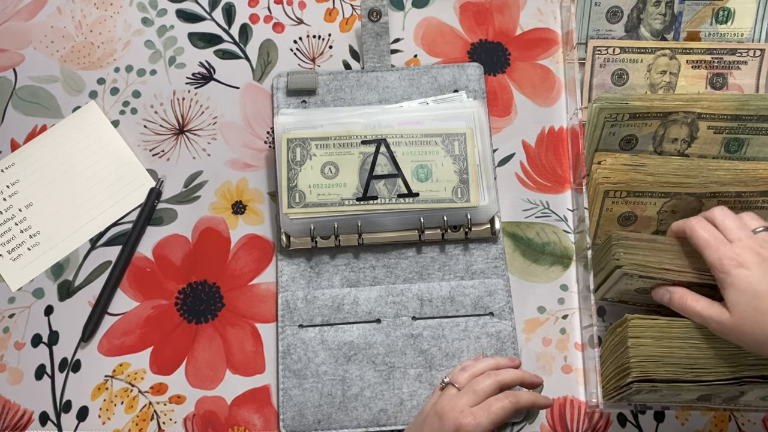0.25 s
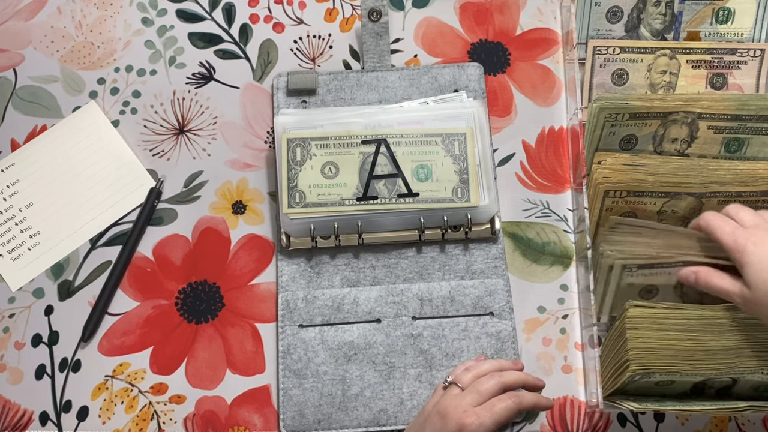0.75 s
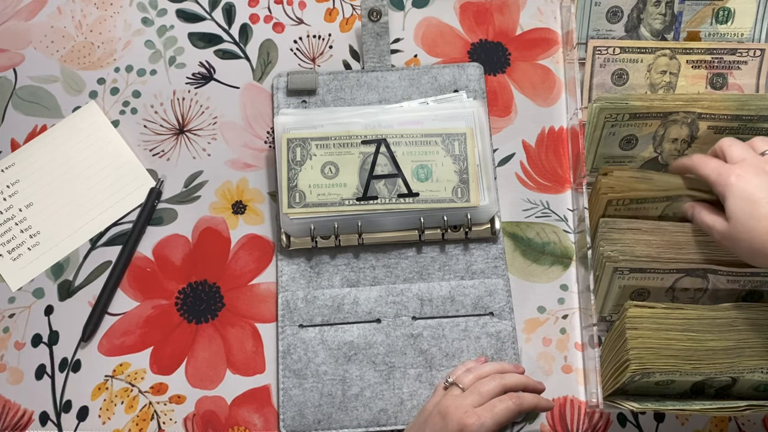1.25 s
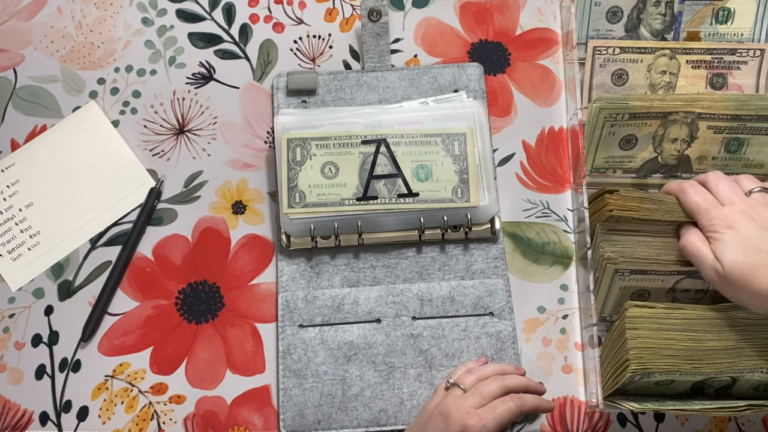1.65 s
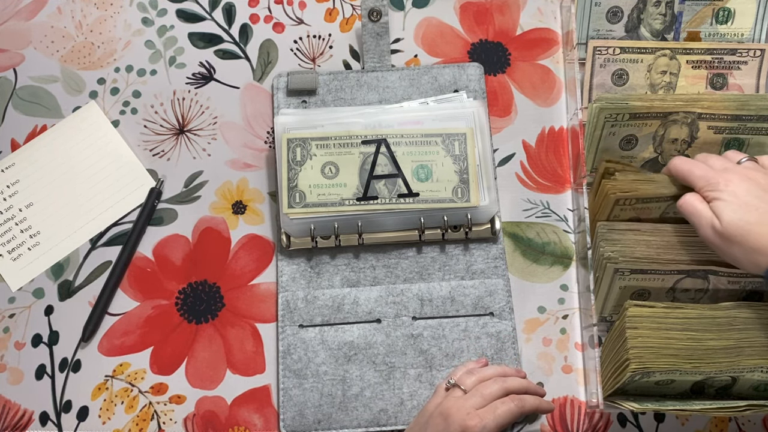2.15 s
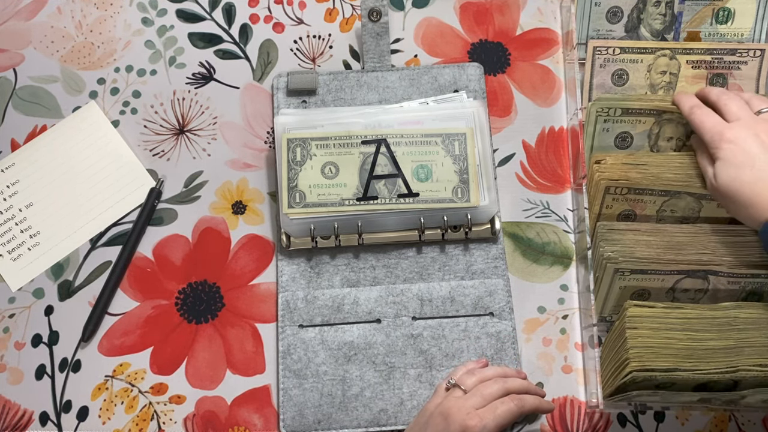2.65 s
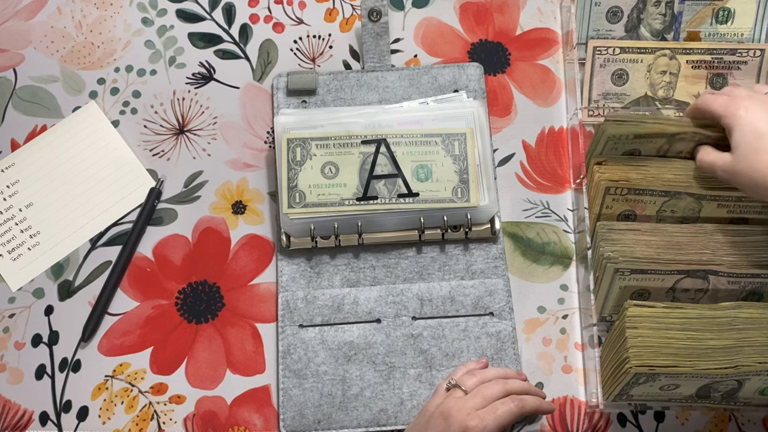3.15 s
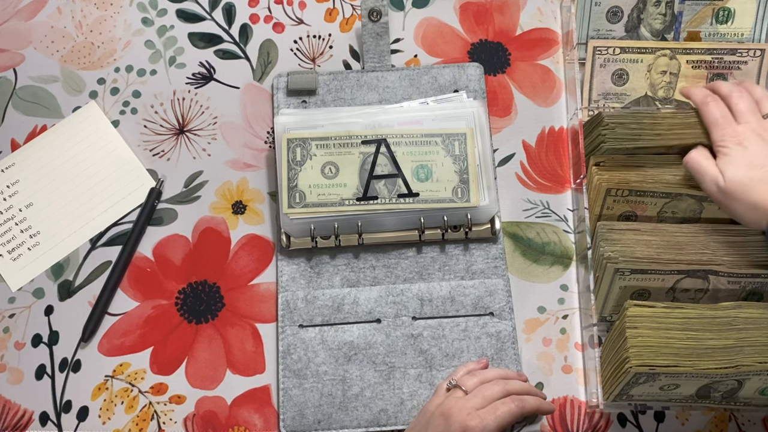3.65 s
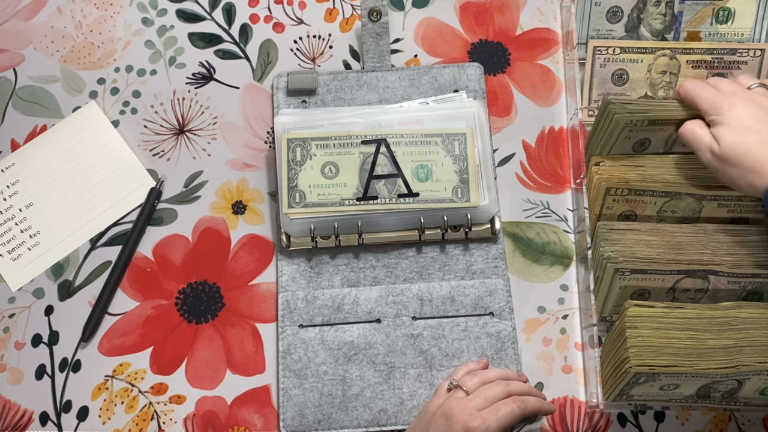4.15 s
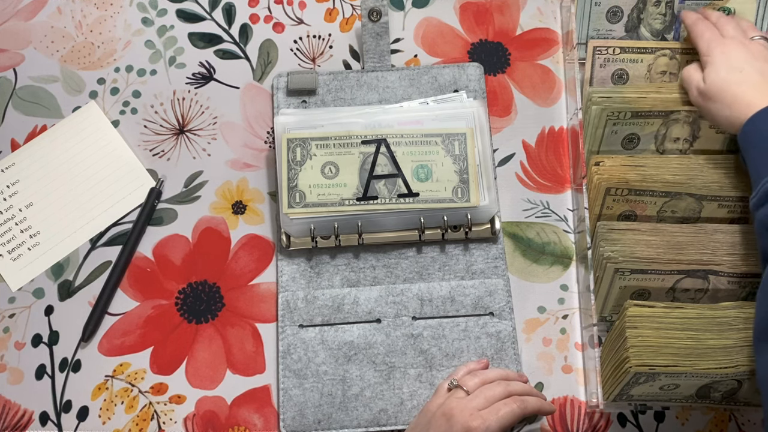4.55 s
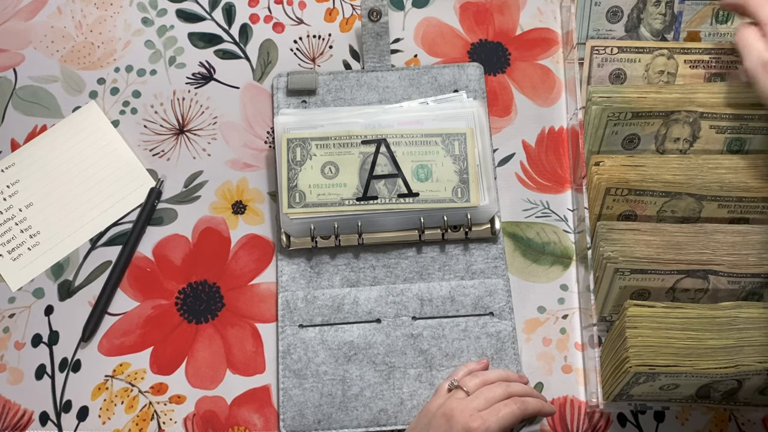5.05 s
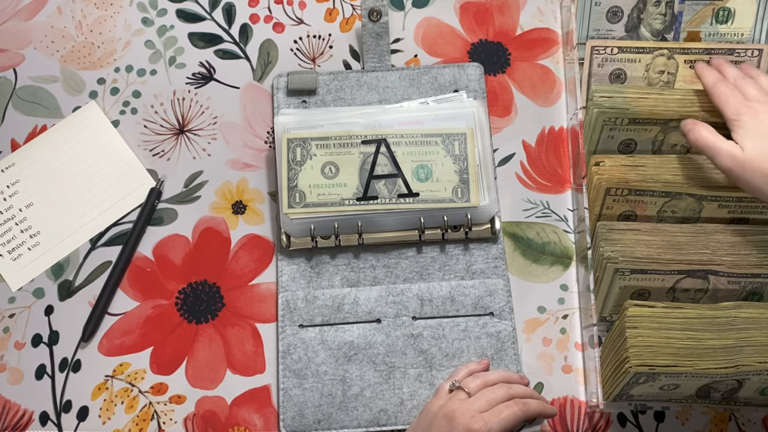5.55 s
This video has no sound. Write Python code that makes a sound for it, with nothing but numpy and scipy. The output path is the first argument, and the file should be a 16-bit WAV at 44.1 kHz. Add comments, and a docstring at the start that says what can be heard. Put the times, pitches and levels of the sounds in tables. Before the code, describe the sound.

Paper money stacks are thumbed through in a tray, with faint rustles, small ticks and a few hard snaps in a quiet room.

```python
"""The after-sound of a snap just gone by, over the low rumble of a house; then paper notes in a tray.
A thumb riffles the stacks on a desk, below and right of a close two-port microphone.
Sheets rub in dense clusters of tiny buckles and flick free in short volleys: ticks and a few hard snaps.
The tray rings, a small room answers with decaying noise, and a wrist knocks softly on the desk near the end."""
import sys
import numpy as np
from scipy import signal
from scipy.fft import rfft, irfft, next_fast_len
from scipy.io import wavfile
from scipy.ndimage import uniform_filter1d

SR = 44100
rng = np.random.default_rng(int(sys.argv[2]) if len(sys.argv) > 2 else 0)


def bounce(signal):
    """Save signal as a 16-bit WAV file at the path given by the first command-line argument."""
    frames = np.transpose(np.atleast_2d(signal))
    limited = np.clip(frames, -1, 1)
    pcm = np.round(limited * 32767).astype(np.int16)
    wavfile.write(sys.argv[1], SR, pcm)


N = 255691
LEAD = SR // 20  # samples of run-in before the start
# paper bands shared by flicks and rubs: (centre_hz, width_hz)
THUD, CRACKLE, SIZZLE = (500, 480), (4200, 5500), (9600, 4600)
OPPOSITE = np.array([[1], [-1]])  # left and right ports in opposite sense


def undb(db):
    """Gain of a dB value."""
    return 10 ** (np.asarray(db) / 20)


def unit(x):
    """Scaled to rms 1."""
    return x / np.sqrt(np.mean(x ** 2))


def band(x, hz, width):
    """Two-pole resonance, applied twice."""
    b, a = signal.iirpeak(hz, hz / width, fs=SR)
    return signal.lfilter(b, a, signal.lfilter(b, a, x))


def colour(x, table, lag_s=0.):
    """Shapes x by (hz, gain_db) points, joined over log frequency, and delays it."""
    size = next_fast_len(x.shape[-1] + LEAD)
    hz = np.fft.rfftfreq(size, 1 / SR) + 1
    points_hz, points_db = np.array(table)[:, 0], np.array(table)[:, 1]
    gain = undb(np.interp(np.log(hz), np.log(points_hz), points_db))
    delay = np.exp(-2j * np.pi * hz * lag_s)
    return irfft(rfft(x, size) * gain * delay, size)[..., :x.shape[-1]]


def creases(shape, rate, scatter_db):
    """Tiny buckles of paper: random clicks (rate per second) of scattered size over faint noise."""
    hit = rng.random(shape) < rate / SR
    clicks = hit * rng.standard_normal(shape) * undb(scatter_db * rng.exponential(size=shape))
    return unit(clicks + 0.0054 * rng.standard_normal(shape))


def flicks():
    """Each flick is a short volley of buckles that shakes the free flap and the paper's other bands, then settles."""
    # sheets flicking free: start_s, flap_peak_db (before panning), flap_hz,
    # thud_db, crackle_db, sizzle_db (all against the flap), left_minus_right_db, swell_ms
    flick_table = [(0.168, -50.5, 1570, -17, -1, -1.5, -5, 2), (0.277, -50, 1720, -16, -10, -28, -8, 5.1),
                   (0.351, -39, 1840, -12.5, -1, -4, -4.5, 2), (0.393, -47.5, 2230, -29, -20, -25, 4, 1.5),
                   (0.495, -41, 1330, -19, -12, -15, -2.0, 1.7), (0.577, -55, 1420, -6, 0, -1, -8, 3.1),
                   (0.63, -57, 1940, -7, -17, -23, 8, 1.8), (0.663, -54.5, 1170, -8, -29, -24, -7, 6.5),
                   (0.734, -40, 1460, -42, -19, -24, -8, 2.1), (0.744, -42.5, 1580, -26, -7.5, -26, 2, 4.6),
                   (0.78, -50, 770, -24, -23, -22, -13, 2.7), (0.798, -54, 865, 7.5, 1, -13, 2.5, 1.8),
                   (0.842, -47, 1670, -22, -30, -25, -6, 1.1), (1.015, -63.5, 1900, 0, 4, 4.5, 5, 1.5),
                   (1.155, -61, 850, 0, -28, -25, -4.0, 2.6), (1.435, -56.5, 1360, 0, -2, -13, -4, 1.3),
                   (1.457, -54.5, 1230, -9, -14, -3.5, -3, 2.2),
                   (1.603, -23.5, 1980, -18.5, -9, -32, -4, 2.6),
                   (1.611, -23.5, 2070, -24, -9.5, -21, 6, 4.7),
                   (1.617, -20.5, 1300, -31.5, -19, -33, -9, 2.45),
                   (1.939, -43, 1600, -7.5, -11, -15, -3.5, 6.8),
                   (1.992, -45, 1660, -27, -17, -21, -6.5, 1.6), (2.157, -48.5, 1360, -13, 4, -4, -5, 0.89),
                   (2.23, -38, 1080, -26, -15, -26, -6.5, 4.2),
                   (2.244, -31, 1060, -14.5, -9, -23, -1.5, 2.1),
                   (2.265, -50, 1150, -14, -20, -27, -1.0, 4.6), (2.361, -61, 1440, -19, 4.5, -9, 2, 1.9),
                   (2.405, -59.5, 1860, -9.5, -11, -8, -6, 1.6),
                   (2.546, -59.5, 1170, -2.5, -20.5, -19.5, -5, 2.3),
                   (2.758, -43.5, 1090, -27, -19.5, -14.5, -3, 1.2),
                   (2.955, -58, 980, -18.5, -17, -17, -6.5, 2.6),
                   (2.988, -51, 920, -11, -16, -33, -4.0, 1.7),
                   (3.051, -32.5, 1200, -35, -22.5, -28, -5, 2.24),
                   (3.063, -38.5, 1440, -16.5, -9.5, -13.5, 5, 0.84),
                   (3.302, -57.5, 1000, -7, -15, -27.5, -3.5, 3.24),
                   (3.442, -51, 977, -8.5, -10, -22, -5.5, 1.8),
                   (3.485, -15.5, 1850, -21.5, 2.5, -17, 5.5, 4.2),
                   (3.487, -11.5, 1550, -22.5, -4, -8, -9, 3.7),
                   (3.495, -16.5, 1680, -20, -6.5, -7, -8, 0.93),
                   (3.955, -56, 2140, -8, -4, -10.5, -1.5, 1.6),
                   (4.003, -50, 1040, -16.5, -16, -18, -6.5, 2.9),
                   (4.04, -46.5, 1380, -9, -8, -16, -5.5, 2.7), (4.073, -44, 2090, -26, -9, -16, 5, 1.6),
                   (4.101, -43, 1935, -24, -5, -13, -3, 3.5), (4.246, -45, 2100, -20.5, -16, -15, -1, 1.9),
                   (4.271, -39, 1720, -18.5, 0.5, -9, -5.5, 2.9),
                   (4.302, -36.5, 960, -18.5, -20, -30, -5, 2.5),
                   (4.319, -33.5, 1315, -17.5, -14, -21.5, -1, 2.3),
                   (4.342, -40, 900, -27.5, -31, -37, -8, 1.87),
                   (4.475, -50.5, 958, -14, -17, -24.5, -5, 3.6),
                   (4.501, -54.5, 940, 4.5, -35, -34, -4, 1.5),
                   (4.571, -52.5, 905, -26, -16.5, -18, -6, 2.3),
                   (4.611, -51, 1556, -42, -29, -24, -3.5, 1.1),
                   (4.738, -38.5, 1003, -34, -24.5, -37, -4.5, 2.8),
                   (4.904, -35, 990, -36, -9.5, -22, -5, 2.3), (4.912, -40, 910, -36, -31, -36, 1, 1.7),
                   (4.981, -36.5, 1197, -22.5, -12, -17, -3.5, 2.33),
                   (5.295, -56, 2150, -17.5, -11, -13.5, -3, 2.8),
                   (5.312, -42, 990, -12, -12, -26, -7.5, 3.1),
                   (5.328, -41.5, 2110, -4, -14.5, -20, 7, 2.8),
                   (5.391, -53, 1383, -22.5, -17.5, -5.5, -4, 1.25),
                   (5.481, -43, 1130, -2.5, -10.5, -21.5, -3.5, 1.27),
                   (5.672, -42.5, 950, -12.5, -11, -11.5, -4, 2.76),
                   (5.74, -56, 910, -10, -25, -26.5, -4, 2.4),
                   (5.765, -65.5, 840, -9.5, -4, -11.5, -12, 2.4)]
    # a snap just before the start: the columns of a flick after start_s
    earlier_snap = (-14, 1764.5, -16.5, 1.5, -14.5, -9, 2)
    earlier_s = -.015
    treble_pan_db = np.array([0, 0, 5.5, 5.5])  # the treble leans further left
    # a freed sheet rustles back onto its stack
    settle_db, settle_t60_s, settle_treble_share = -31, 0.13, 0.28
    settle_width = 0.49  # part that differs between the ports, against the common part
    # multiples of settle_t60_s: flap, thud, crackle, sizzle
    t60_shares = (0.47, 1.1, 2.5, 0.17)
    # the thumb drags over a sheet just before it lets go
    scuff_db, scuff_rise_s, scuff_treble_db = -17, 0.0047, -10
    scuff_loss_per_db = 0.3531  # harder flicks have relatively less scuff, softer ones more

    rows = [(earlier_s, *earlier_snap)] + list(flick_table)
    t = np.arange(SR // 3) / SR
    drag = SR // 30  # samples of scuff
    volleys = np.zeros((2, N + LEAD + len(t)))
    settling = np.zeros_like(volleys)
    chance = creases((len(rows), len(t)), rate=22000., scatter_db=3.5)
    rustles = creases((len(rows), 2, len(t)), rate=11000.0, scatter_db=4.0)
    for row, buckles, rustle in zip(rows, chance, rustles):
        s, db, flap_hz, thud_db, crackle_db, sizzle_db, pan_db, ms = row
        bands = ((flap_hz, 0.85 * flap_hz), THUD, CRACKLE, SIZZLE)
        mix_db = np.array([0, thud_db, crackle_db, sizzle_db])
        ports = [undb([[d / 2], [-d / 2]]) for d in pan_db + treble_pan_db]

        # the volley swells to its top after the given length, then dies away
        u = t[:2048] * 1000 / ms
        shove = buckles[:len(u)] * u ** 0.9 * np.exp(-u ** 0.9)
        volley = 0
        for d, g, b in zip(mix_db, ports, bands):
            shaken = band(shove, *b)
            volley = volley + undb(db + d) * g * shaken / np.abs(shaken).max()

        rustle = rustle[0] + settle_width * rustle[1] * OPPOSITE
        grain_db = db + mix_db * [1, 1, settle_treble_share, settle_treble_share]
        grain = [undb(d) * g * unit(band(rustle, *b)) for d, g, b in zip(grain_db, ports, bands)]
        after = sum(g * undb(settle_db - 60 * t / (k * settle_t60_s))
                    for g, k in zip(grain, t60_shares))
        after = after * np.minimum(t / .006, 1)

        scuff = (sum(grain[:2]) + undb(scuff_treble_db) * sum(grain[2:]))[:, -drag:]
        scuff_gain = undb(scuff_db - scuff_loss_per_db * (db + 39.5))
        before = scuff * scuff_gain * np.exp(-t[:drag][::-1] / scuff_rise_s)

        at = LEAD + int(s * SR)
        volleys[:, at:at + len(u)] += volley
        settling[:, at:at + len(t)] += after
        settling[:, at - drag:at] += before
    return volleys[:, :N + LEAD], settling[:, :N + LEAD]


def slide():
    """Dense buckles while sheets rub, in uneven clusters as the fibres grip and slip."""
    # sheets rubbing past each other: start_s, end_s, flap_level_db (rms, mid-rub, before the fades),
    # flap_hz, crackle_db, sizzle_db (against the flap), change_db (start to end)
    rub_table = [(0.09, 0.256, -69.5, 1920, -24, -10, -20), (0.248, 0.36, -59.5, 1760, -27, -13.5, 9),
                 (0.337, 0.52, -75.5, 1910, -6, -0.5, -10), (0.501, 0.648, -68.5, 1740, -34, -9, -5),
                 (0.641, 0.757, -64.5, 1560, -7.5, -11, 21), (0.755, 0.817, -69.5, 1450, -1.5, -4, -12),
                 (0.812, 0.931, -63, 1610, -9, -8, 10), (0.951, 1.022, -71, 1630, -4, 0.5, 10),
                 (1.147, 1.225, -73, 1050, -13, -15.5, -9), (1.271, 1.42, -73.5, 1420, -8.5, -2.5, 7.5),
                 (1.432, 1.61, -75.5, 1140, -7, -8, -10), (1.819, 1.907, -73, 1600, -29, -20, 6),
                 (1.891, 1.967, -56.5, 1240, -39, -16.5, 20), (1.958, 2.031, -63, 1640, -19, -10.5, -20),
                 (2.13, 2.259, -65, 1300, -9.5, -11, -2), (2.352, 2.419, -69, 1660, -0.5, 2, -1),
                 (2.857, 2.97, -79, 1266, -5.5, -6, -2), (2.932, 3.077, -74, 1040, -20, -20, -3.5),
                 (3.153, 3.27, -78.5, 1240, -16.5, -3.5, 6), (3.289, 3.367, -76, 1130, -10.5, -18, 12),
                 (3.849, 3.973, -80.5, 1237, -1.5, -2, 5), (3.968, 4.079, -61.5, 1424, -30, -12, 13.5),
                 (4.073, 4.17, -65, 1900, -12.5, -17, -19), (4.208, 4.298, -71, 1770, -12.5, -20.5, 6),
                 (4.444, 4.506, -68.5, 980, -11.5, -11.5, -14), (4.568, 4.702, -67, 1030, -13.5, -12, -4.5),
                 (4.685, 4.761, -55.5, 1058, -18, -22, 3.5), (4.786, 4.841, -72, 1430, 3.5, 0.5, -8.5),
                 (5.289, 5.34, -57, 1286, -8, -2, -8), (5.373, 5.404, -70, 1100, -4.5, -8.5, -18)]
    rub_crackle = (4570, 1900.)  # centre_hz, width_hz
    rub_thud_db = -4.5  # against the flap
    stray_per_s, stray_db = 90., -11  # faint chance ticks among the dense buckles

    hold, edge = int(0.01 * SR), int(0.039 * SR)
    steps = np.repeat(rng.standard_normal(N // hold + 1), hold)[:N]
    grip = uniform_filter1d(steps, hold // 2)
    buckles = creases(N, rate=7000., scatter_db=-2.63) * undb(1.2 * grip)
    buckles = buckles + undb(stray_db) * creases(N, rate=stray_per_s, scatter_db=0.5)
    thud, crackle, sizzle = (unit(band(buckles, *where)) for where in (THUD, rub_crackle, SIZZLE))
    sound = np.zeros(N)
    for start, end, db, flap_hz, crackle_db, sizzle_db, change_db in rub_table:
        a, b = int(start * SR), min(int(end * SR) + edge, N)
        rub = unit(band(buckles[a:b], flap_hz, .9 * flap_hz))
        rub = rub + undb(rub_thud_db) * thud[a:b]
        rub = rub + undb(crackle_db) * crackle[a:b] + undb(sizzle_db) * sizzle[a:b]
        # a rub catches quickly and lets go more slowly
        n = np.arange(b - a)
        fade = np.minimum(np.minimum(2.0 * n, 0.34 * n[::-1]) / edge, 1)
        sound[a:b] += rub * fade * undb(db + change_db * np.linspace(-.5, .5, b - a))
    return np.pad(sound, (LEAD, 0)) * undb([[-1.5], [0]])  # weaker at the left port


def tray(x):
    """The hollow tray rings briefly under the paper: decaying sines set off by the sound itself."""
    # modes of the tray: mode_hz, level_db (relative), t60_s
    modes = [(1085, -10.5, 0.04), (1267, -13.5, 0.022), (1396, -20, 0.022), (1720, -22, 0.059),
             (2270, -24, 0.015), (4610, -17, 0.053)]
    t = np.arange(SR // 5) / SR
    ring = sum(undb(db - 60 * t / t60) * np.sin(2 * np.pi * hz * t) for hz, db, t60 in modes)
    return x + undb(-35.5) * signal.fftconvolve(x, ring[None], axes=1)[:, :x.shape[1]]


def room(x):
    """Quick echoes from desk and tray, then a diffuse tail, each band dying at its own rate."""
    # diffuse tail of the small room: band_hz, t60_s
    tail_bands = [(300, 1), (1000, 0.49), (2500, 0.33), (5000, 0.47), (9000, 0.36)]
    early_db, early_t60_s = 5, 0.21  # level against the diffuse tail
    t = np.arange(SR // 2) / SR
    early = undb(early_db - 60 * t / early_t60_s)

    def decaying_noise():
        """Bands of noise under the early and the late decay."""
        total = 0
        for hz, t60 in tail_bands:
            noise = unit(band(rng.standard_normal(len(t)), hz, 1.4 * hz))
            total = total + noise * np.sqrt(hz) * (early + undb(-60 * t / t60))
        return total

    mid, side = decaying_noise(), decaying_noise()
    # the ports hear most of it alike
    tail = (mid + .45 * side * OPPOSITE) * np.minimum(t / .003, 1)
    tail = tail / np.sqrt(np.mean(np.sum(tail ** 2, axis=1)))
    return signal.fftconvolve(x.mean(axis=0, keepdims=True), tail, axes=1)[:, :x.shape[1]]


def knock():
    """Wrist on the desk: a few low cosine cycles under a bell-shaped envelope."""
    # one knock: centre_s, pitch_hz, peak_db (before the lean to the right), half_length_s (to 1/e)
    knock_row = (5.705, 70, -37, .011)
    s, hz, db, half_s = knock_row
    t = np.arange(N) / SR - s
    return -undb(db) * np.cos(2 * np.pi * hz * t) * np.exp(-(t / half_s) ** 2)


def house():
    """Low noise rumble that swells and sinks by chance, nearly alike at both ports, plus the knock."""
    # spectrum of the rumble: hz, density_db (per Hz, relative)
    spectrum = [(21, -44.5), (35, -12.5), (97, -8), (145, -15), (169, -24), (207, -23.5), (245, -23),
                (401, -43), (451, -37.5), (483, -33.5), (2000, -58.5), (2600, -99), (4400, -120)]
    # course of the rumble: time_s, level_db (before the chance swell and the lean)
    course = [(0.0, -55.5), (0.56, -60.5), (0.97, -53), (1.03, -59.5), (3.44, -61), (3.5, -54), (3.75, -60),
              (5.67, -60), (5.7, -46), (5.8, -64)]
    swell_db, swell_s = 1.8, .06  # rms wavering and its smoothing span
    mid, side = (unit(colour(rng.standard_normal(N), spectrum)) for _ in range(2))
    span = int(swell_s * SR)
    swell = unit(uniform_filter1d(uniform_filter1d(rng.standard_normal(N), span), span))
    level = undb(np.interp(np.arange(N) / SR, *np.transpose(course)) + swell_db * swell)
    rumble = level * (mid + .13 * side * OPPOSITE)
    return (rumble + knock()) * undb([[-.85], [.85]])  # leans to the right port


def scene():
    """Paper and its echoes reach the right port first; the house rumbles under them."""
    room_db, rustle_wet_db = -9, -13.5  # room level; rubs and settling excite it less than the ticks
    left_lag_s = 3e-5
    ticks, settling = flicks()
    ticks, rustle = tray(ticks), slide() + tray(settling)
    echoes = room(ticks + undb(rustle_wet_db) * rustle)
    paper = ticks + rustle + undb(room_db) * echoes
    flat = [(1, 0), (2, 0)]
    paper = np.array([colour(paper[0], flat, left_lag_s), paper[1]])
    return paper[:, LEAD:] + house()


def record(dry):
    """Own hiss of each port, microphone colour, steep top."""
    # hiss of a port ahead of the microphone colour: hz, level_db (of white noise as strong there)
    hiss = [(1000, -82), (4000, -85), (9000, -89), (14000, -92)]
    # colour of the microphone: hz, gain_db
    response = [(100, -1.5), (7000, 6), (8400, 6), (10200, 11), (11300, 6), (11900, -14), (14000, 0),
                (15500, -15.5)]
    top_hz = 15600
    wet = colour(dry + colour(rng.standard_normal(dry.shape), hiss), response)
    return signal.sosfilt(signal.ellip(8, .2, 70, top_hz, fs=SR, output="sos"), wet)


dry = scene()
out = record(dry)
bounce(out)
```